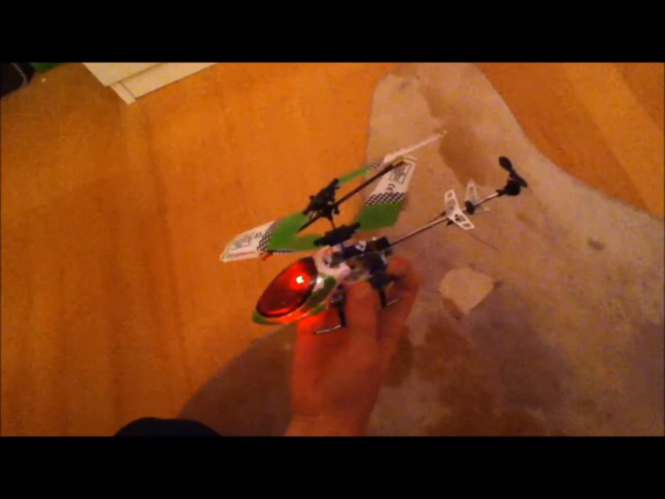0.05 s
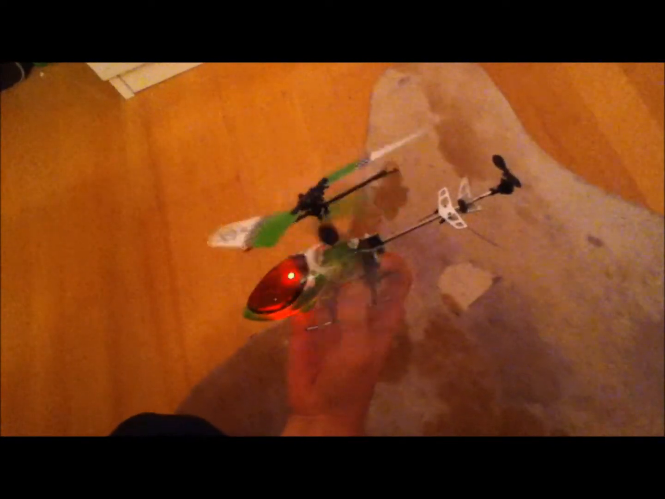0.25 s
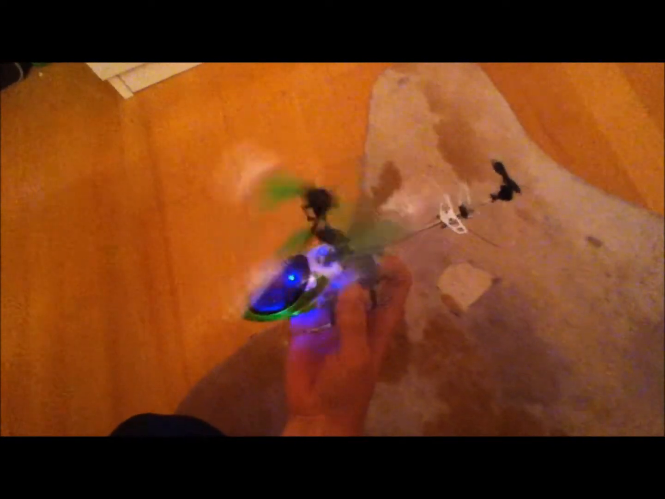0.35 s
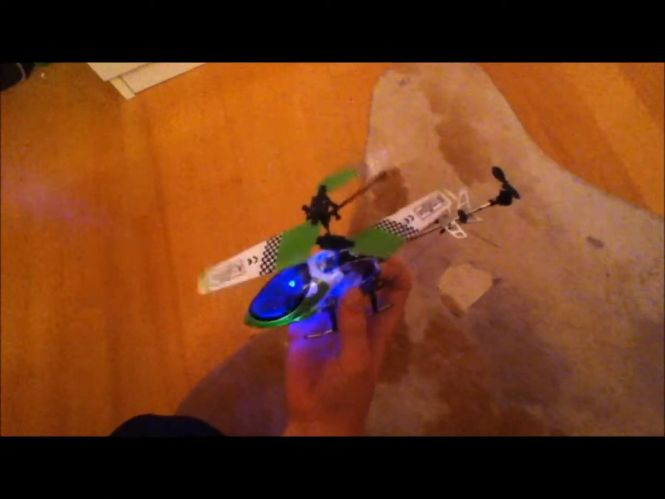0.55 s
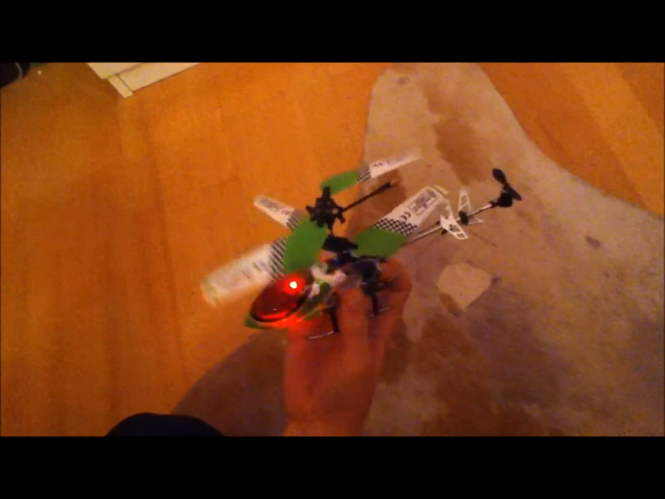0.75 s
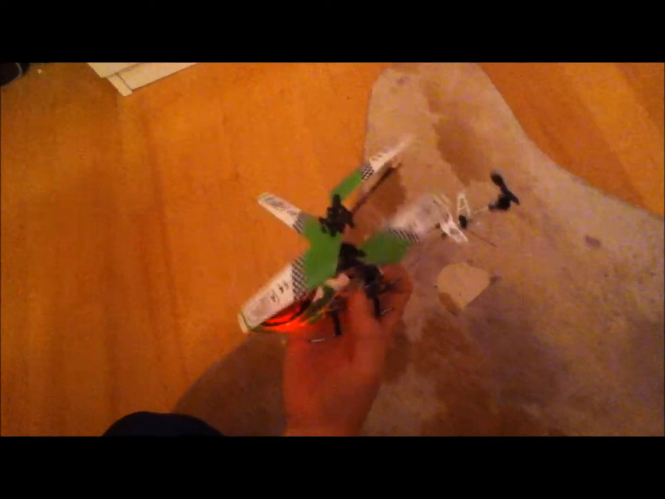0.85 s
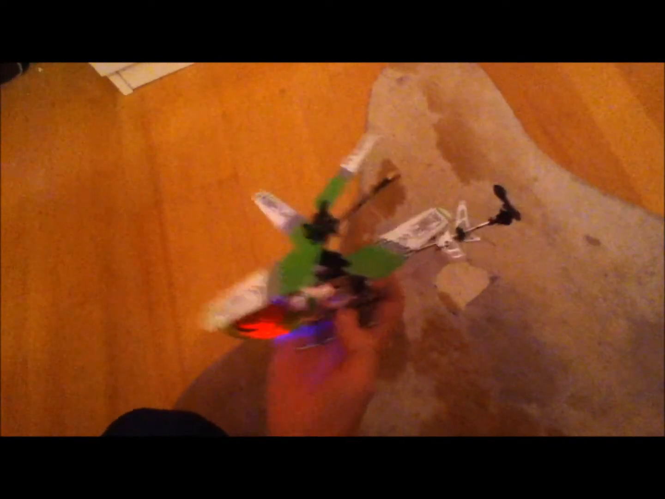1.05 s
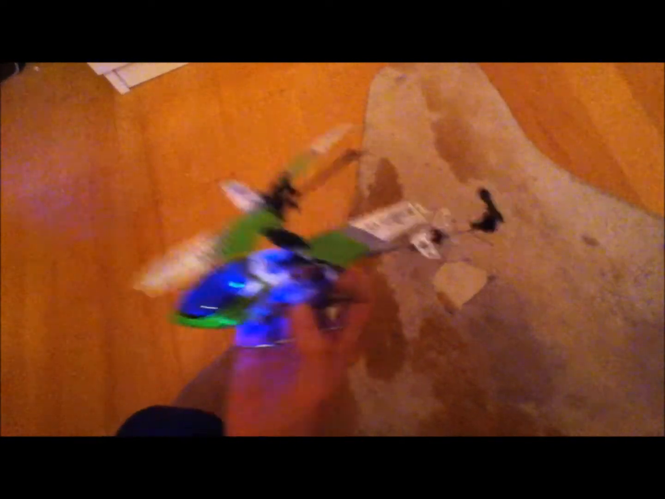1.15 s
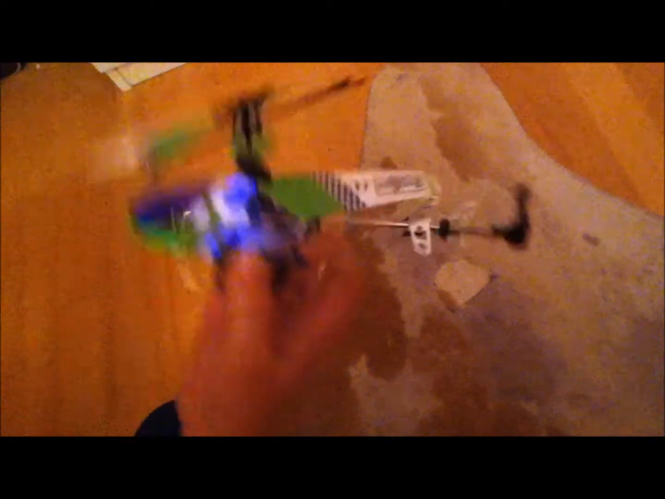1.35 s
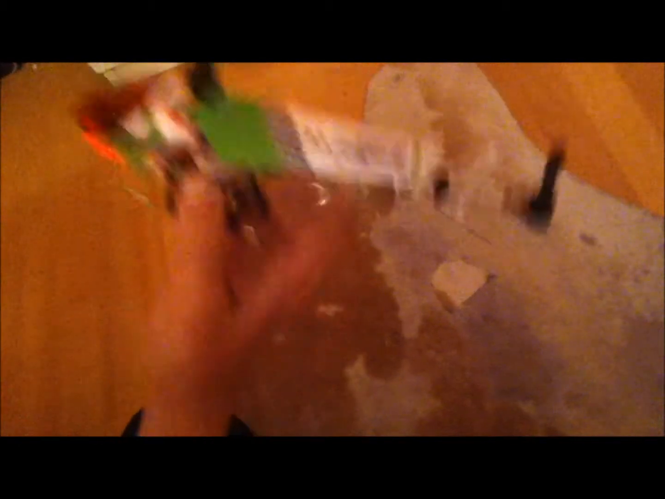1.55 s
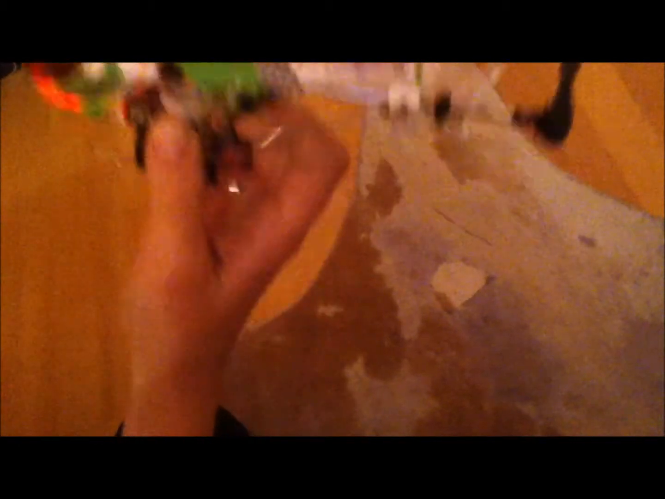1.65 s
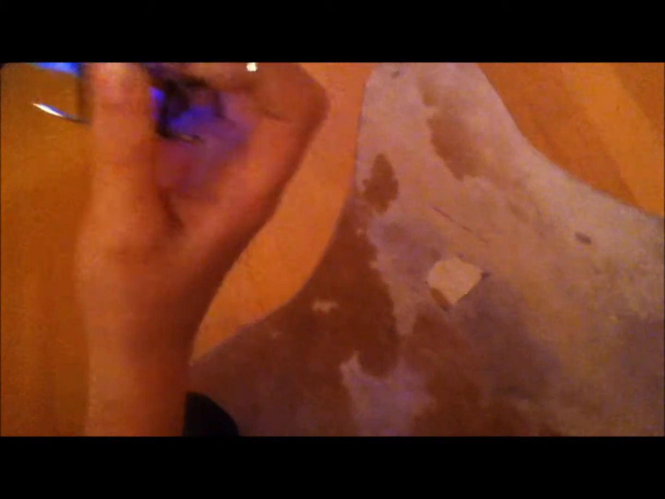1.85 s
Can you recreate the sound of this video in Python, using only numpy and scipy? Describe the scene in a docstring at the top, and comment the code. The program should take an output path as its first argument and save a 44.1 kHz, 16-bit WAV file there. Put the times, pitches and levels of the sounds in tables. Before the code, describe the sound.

Close up in a small room with a faint hum, a toy helicopter spins up with a squeaky rasp. A blade clacks once, the gears whine and rattle, then coast down, followed by light handling knocks.

```python
"""A small room with a faint hum, one microphone close to a hand-held toy helicopter.
Its two rotor motors start with a rasp and squeal of plastic gears. The meshing teeth whine, the two
motors beating against each other, while loose teeth rattle the hull and a blade clacks once.
The motors coast down with a hiss of brushes; then fingers rub and knock the hull."""
import sys
import numpy as np
from scipy import signal
from scipy.fft import rfft, irfft, next_fast_len
from scipy.io import wavfile
from scipy.ndimage import uniform_filter1d, minimum_filter1d, map_coordinates

SR = 44100
rng = np.random.default_rng(int(sys.argv[2]) if len(sys.argv) > 2 else 0)


def unload_wav(signal):
    """Save mono or channel-first audio to the path in sys.argv[1] as 16-bit WAV at rate SR, clipped to [-1, 1]."""
    wavfile.write(
        sys.argv[1],
        SR,
        np.round(np.clip(np.atleast_2d(signal).T, -1, 1) * 32767).astype(np.int16),
    )


N = 83790

# room tone at the microphone: t/s, level/dB
ROOM_TONE_LEVEL = [(0, -51), (.2, -51), (.4, -57.5), (1.2, -54), (1.7, -53.5), (1.9, -52.5)]
# spectrum of the room tone: f/Hz, relative level/dB
ROOM_TONE_COLOUR = [(15, -42), (25, -12.5), (127, -1), (363, -6.5), (416, -10.5), (451, -6), (591, -14.5),
                    (641, -8.5), (775, -16), (1070, -12), (1230, -19), (2690, -20.5), (3080, -22),
                    (14800, -28.5), (16000, -17.5)]
# reverberation of the room: f/Hz, t60/s
ROOM_DECAY = [(200, .35), (1800, 0.5), (5000, 0.14), (14000, 0.52)]

# a finger sliding on the hull: t/s, level/dB
RUB_LEVEL = [(1.36, -76.5), (1.397, -44.5), (1.425, -42), (1.465, -49.5), (1.49, -66)]
# spectrum of the rub: f/Hz, relative level/dB
RUB_COLOUR = [(470, -71.5), (800, -37), (1590, -6.5), (1780, -6.5), (2730, -15.5), (3360, -10.5),
              (4680, -22), (6600, -13), (8030, -21.5), (10500, -13.5), (15000, -42)]
# fingers knocking the hull: t/s, level/dB, t60/s, tilt/(dB per octave)
KNOCKS = [(1.4745, -36.5, 0.022, 0), (1.4805, -28, 0.027, 1.5), (1.4845, -25.5, 0.069, 0),
          (1.4895, -26.5, .035, -2.5), (1.506, -42.5, .1, 3), (1.8095, -34.5, 0.055, 2),
          (1.8165, -38, .025, 2), (1.8205, -37, 0.041, 3.5)]
# spectrum of a knock: f/Hz, relative level/dB
KNOCK_COLOUR = [(290, -63), (500, -33.5), (1000, -27), (1770, 0.5), (2100, -12), (2570, -21), (3180, -15.5),
                (4540, -26), (7360, -19.5), (9380, -27), (10500, -27), (13800, -41), (15000, -33.5)]
# a blade striking and bouncing: t/s, level/dB, t60/s, tilt/(dB per octave)
CLACKS = [(.4915, -5.5, 0.038, 1.5), (.499, -20.5, .03, -8), (.511, -22, .06, -7.5)]
# spectrum of the clack: f/Hz, relative level/dB
CLACK_COLOUR = [(200, -69.5), (700, -46), (1600, -16.5), (2800, -13), (3500, -9), (3950, 3.5), (4550, -0.5),
                (5500, -14), (7000, -10.5), (11500, -17.5), (15000, -29.5)]

# brush hiss, strongest as the motors coast: t/s, level/dB
BRUSH_LEVEL = [(.95, -67), (1.1, -46), (1.23, -51.5), (1.32, -53.5), (1.4, -61)]
# spectrum of the brushes: f/Hz, relative level/dB
BRUSH_COLOUR = [(1000, -32.5), (3000, -14.5), (4150, -0.5), (5200, -6.5), (8200, -2.5), (9200, 3),
                (10300, -5.5), (13000, -16.5), (16000, -16.5)]
# gears slipping at the start: t/s, f/Hz, level/dB
SQUEAL = [(.25, 2361, -35), (.276, 2198, -12.5), (.287, 2033, -9), (.297, 1971, -9), (.306, 1877, -19.5),
          (.313, 2079, -8), (.321, 1928, -39.5), (.333, 1972, -10.5), (.343, 2000, -16.5),
          (.37, 1927, -43.5)]
# teeth sliding on each other: t/s, level/dB
RASP_LEVEL = [(.228, -15.5), (.25, -16.5), (.28, -11), (.3, -18.5), (.34, -15), (.36, -28), (.41, -18.5),
              (.46, -20.5), (.55, -26), (.7, -27.5), (.82, -26.5), (.93, -36.5), (.98, -31.5), (1.015, -30),
              (1.04, -42), (1.065, -33), (1.1, -51.5), (1.18, -57.5), (1.3, -59.5), (1.4, -63)]
# low end of the rasp's spectrum: f/Hz, relative level/dB
RASP_LOWS = [(100, -59), (700, -30.5), (1100, -19), (1300, -13)]
# the rest of that spectrum: f/Hz, relative level/dB
RASP_HIGHS = [(1410, -22.5), (2400, -10.5), (2590, -8.5), (3200, -1.5), (3440, -13.5), (3920, -2.5),
              (5160, -6), (5660, -4.5), (6370, -11.5), (7050, -3.5), (8980, -9), (11200, -10.5),
              (12800, -12.5), (14400, -18.5), (15500, -23.5)]
# narrow rings of the metal motor parts: f/Hz, width/Hz, relative level/dB
METAL_MODES = [(7074, 190, 1.5), (11290, 110, 0.5)]
# loose teeth rattling the hull: t/s, level/dB
RATTLE_LEVEL = [(.228, -16.5), (.265, -23), (.288, -47), (.305, -35), (.335, -13.5), (.355, -32),
                (.47, -22), (.56, -29), (.64, -25.5), (.85, -26.5), (.92, -40), (1.0, -37.5), (1.1, -32.5),
                (1.18, -38.5), (1.265, -40.5), (1.29, -58), (1.4, -60)]
# resonances of the plastic hull: f/Hz, width/Hz, relative level/dB
HULL_MODES = [(1232, 160, -18.5), (1516, 200, -2.5), (1827, 275, 0.5), (1910, 156, 6.5), (2142, 520, -4)]
# rate at which the gear teeth meet: t/s, f/Hz
TOOTH_RATE = [(.228, 250), (.29, 495.9), (.36, 659.3), (.45, 772), (.54, 792), (.6, 812.3), (.69, 825.8),
              (.85, 810.5), (.885, 830.7), (.97, 809.4), (1.0, 717.5), (1.05, 579.2), (1.11, 475),
              (1.19, 354.2), (1.3, 220), (1.4, 89.3)]
# whine of the meshing teeth: t/s, level/dB
WHINE_LEVEL = [(.228, -53), (.35, -27.5), (.44, -27.5), (.55, -24.5), (.61, -22), (.68, -19.5),
               (.735, -18.5), (.785, -20), (.825, -17), (.88, -21), (.94, -14), (.98, -16.5),
               (1.025, -15.5), (1.045, -28.5), (1.11, -26), (1.135, -37.5), (1.19, -42.5), (1.27, -51),
               (1.3, -78), (1.4, -94)]
# how the hull radiates the whine: f/Hz, relative level/dB
WHINE_COLOUR = [(300, -15.5), (600, -32.5), (820, -19), (1020, -21), (1250, -19.5), (1600, -0.5),
                (2000, 2.5), (2480, -6.5), (3200, -14), (4100, -10), (4900, -11), (5700, -12.5),
                (6500, -15.5), (9000, -21), (10600, -23), (11400, -24.5), (12200, -24.5), (14000, -29)]
# two motors, the second weaker and duller: speed offset/share, relative level/dB, tilt/(dB per octave)
MOTORS = [(-.00946, 0, .015), (.0086, -2.5, -3.5)]

START_S, ATTACK_S, STOP_S, RELEASE_S = .2273, .0075, 1.38, .05
POWER_OFF_S, UNLOAD_S = .88, .067
BEAT_CREST_S, THROB_CREST_S, TEETH_PER_TURN = .647, .745, 57.94
THROB_DB, TREBLE_THROB_DB = 1, 2.5  # the whine swells once a rotor turn, more so in the treble
TREBLE_HZ, COAST_TREBLE_DB = 3270, -7  # unloaded teeth sound duller
BACKLASH_RAD, COAST_EXTRA_RAD = .2, 1.3  # and rougher: phase scatter of the treble


def amp(db):
    """Decibels to gain."""
    return 10 ** (np.asarray(db) / 20)


def unit(x):
    """Scale to rms 1."""
    return x / np.sqrt(np.mean(x ** 2) + 1e-20)


def clock():
    """Time of each sample in seconds."""
    return np.arange(N) / SR


def curve(rows):
    """Join (t/s, value) points by straight lines."""
    return np.interp(clock(), *np.transpose(rows))


def along(points, hz):
    """Read (f/Hz, value) points on a log frequency axis."""
    f, values = np.transpose(points)
    return np.interp(np.log(hz + 1), np.log(f + 1), values)


def wobble(rate):
    """A smooth random curve, rate knots a second."""
    t = clock()
    knots = rng.standard_normal(4096)
    return np.interp(t, t[::8], map_coordinates(knots, [t[::8] * rate], mode="wrap"))


def filtered(x, response):
    """Pass x through a frequency response."""
    size = next_fast_len(N + SR // 2)
    return irfft(rfft(x, size) * response(np.fft.rfftfreq(size, 1 / SR)), size)[:N]


def noise(colour, grain=1):
    """Coloured noise of rms 1, optionally broken into grains."""
    return unit(filtered(grain * rng.standard_normal(N), lambda hz: amp(along(colour, hz))))


def resonances(modes, f):
    """Summed response of damped modes of alternating sign."""
    return sum((-1) ** k * amp(db) * 1j * f * width / (centre ** 2 - f ** 2 + 1j * f * width)
               for k, (centre, width, db) in enumerate(modes))


def plastic_hits(rows, colour, rise_s):
    """Well damped blows on plastic: noise bursts, each with its own brightness and decay."""
    out = np.zeros(N)
    for onset, db, t60, tilt_db in rows:
        age = np.maximum(clock() - onset, 0)
        tilted = [(hz, level + tilt_db * np.log2(hz / 3000)) for hz, level in colour]
        attack = 1 - np.exp(-(age / rise_s) ** 2)
        decay_db = 60 * np.maximum(age - 2 * rise_s, 0) / t60
        out += noise(tilted) * attack * amp(db - decay_db)
    return out


def room_tone(hum_hz=457.6, hum_db=-62.5):
    """Behind the toy: dull room noise and a faint steady hum."""
    pitch = hum_hz + .8 * wobble(10)
    hum = np.sqrt(2) * np.sin(2 * np.pi * np.cumsum(pitch) / SR)
    return amp(curve(ROOM_TONE_LEVEL)) * noise(ROOM_TONE_COLOUR) + amp(hum_db) * hum


def room_reverb(direct, level_db=-11):
    """The walls' reflections reach the microphone 5 ms late; each band dies at its own rate."""
    hz, t, spectrum = signal.stft(rng.standard_normal(SR // 2), SR, nperseg=256)
    decay = amp(-60 * t / along(ROOM_DECAY, hz)[:, None])
    tail = signal.istft(spectrum * decay, SR, nperseg=256)[1]
    response = np.pad(tail / np.linalg.norm(tail), (SR // 200, 0))
    return amp(level_db) * signal.fftconvolve(direct, response)[:N]


def fingers():
    """Handling noise: fingers knock the hull and slide over it."""
    knocks = plastic_hits(KNOCKS, KNOCK_COLOUR, rise_s=.001)
    return knocks + noise(RUB_COLOUR) * amp(curve(RUB_LEVEL))


def blade_clack():
    """A blade strikes once, with two softer, duller bounces."""
    return plastic_hits(CLACKS, CLACK_COLOUR, rise_s=.003)


def brush_hiss():
    """The motors' sliding brushes give a thin hiss."""
    return noise(BRUSH_COLOUR) * amp(curve(BRUSH_LEVEL))


def gear_squeal(waver=.045):
    """Stick-slip as the gears take up the load: a rough falling tone."""
    times, hz, db = np.transpose(SQUEAL)
    pitch = np.interp(clock(), times, hz) * (1 + waver * wobble(600))
    level = np.interp(clock(), times, amp(db), left=0, right=0)
    return np.sqrt(2) * level * np.sin(2 * np.pi * np.cumsum(pitch) / SR)


def gear_rasp(tooth_hz, grain_db=1, metal_db=-5):
    """Bright grainy friction, pulsing once a tooth, with a thin sizzle from the metal parts."""
    pulses = 1 + .5 * np.cos(2 * np.pi * np.cumsum(tooth_hz) / SR)
    grain = unit(pulses * amp(grain_db * wobble(810)))
    sizzle = unit(filtered(rng.standard_normal(N), lambda f: resonances(METAL_MODES, f)))
    friction = noise(list(RASP_LOWS) + list(RASP_HIGHS), grain)
    return (friction + amp(metal_db) * sizzle) * amp(curve(RASP_LEVEL))


def hull(f):
    """Response of the plastic shell, which is too small to radiate bass."""
    radiation = (1j * f / (1j * f + 900)) ** 2
    bass_cut = 1 / np.sqrt(1 + (1150 / (f + 1)) ** 10)
    return resonances(HULL_MODES, f) * radiation * bass_cut


def gear_rattle(tooth_hz, jitter_teeth=.12, scatter_db=2.5):
    """Each tooth strikes a little early or late, with its own force, and rings the hull."""
    teeth = np.cumsum(tooth_hz) / SR
    count = int(teeth[-1])
    timing, force = rng.standard_normal((count, 2)).T
    strike_samples = np.interp(np.arange(count) + jitter_teeth * timing, teeth, np.arange(N))
    blows = np.bincount(strike_samples.astype(int), amp(scatter_db * np.clip(force, -2, 2)), N)
    ring = filtered(blows, hull)
    running_rms = np.sqrt(np.abs(uniform_filter1d(ring ** 2, size=900)) + 1e-12)
    return ring / running_rms * amp(curve(RATTLE_LEVEL))


def gear_whine(tooth_hz, flutter_share=.004, shimmer_db=3.43):
    """Tooth harmonics of two motors beat; play between the teeth blurs the treble, most when coasting."""
    out, t = np.zeros(N), clock()
    coasting = np.clip((t - POWER_OFF_S) / UNLOAD_S, 0, 1)
    backlash = BACKLASH_RAD + COAST_EXTRA_RAD * coasting
    flutter = flutter_share * wobble(120)
    rotor_turns = np.cumsum(tooth_hz) / SR / TEETH_PER_TURN
    throb = np.cos(2 * np.pi * (rotor_turns - np.interp(THROB_CREST_S, t, rotor_turns)))
    treble_db = COAST_TREBLE_DB * coasting + TREBLE_THROB_DB * throb
    for offset, motor_db, tilt_db in MOTORS:
        hz = tooth_hz * (1 + offset + flutter)
        teeth = np.cumsum(hz) / SR
        teeth -= np.interp(BEAT_CREST_S, t, teeth)  # the motors are in step here
        for k in range(1, 18):
            treble_share = 1 / (1 + (TREBLE_HZ / (k * hz)) ** 10)
            db = motor_db + tilt_db * np.log2(k) + along(WHINE_COLOUR, k * hz)
            db += treble_share * treble_db + shimmer_db * wobble(70.06)
            blur = backlash * treble_share * wobble(400)
            out += amp(db) * np.sin(2 * np.pi * k * teeth + k * k + blur)  # k * k spreads the phases
    return out * amp(curve(WHINE_LEVEL) + THROB_DB * throb)


def scene():
    """The toy up close and the room behind it, mono on both channels."""
    tooth_hz, t = curve(TOOTH_RATE), clock()
    running = np.clip((t - START_S) / ATTACK_S, 0, 1) * np.clip(1 - (t - STOP_S) / RELEASE_S, 0, 1)
    gears = gear_whine(tooth_hz) + gear_rattle(tooth_hz) + gear_rasp(tooth_hz) + gear_squeal()
    toy = running * (gears + brush_hiss()) + fingers() + blade_clack()
    return np.tile(toy + room_reverb(toy) + room_tone(), (2, 1))


def record(dry):
    """After the microphone, a fast limiter holds peaks at full scale and the top treble is cut."""
    limiter_s, top_hz = .002, 16000
    window = int(limiter_s * SR)
    needed_gain = 1 / np.maximum(np.abs(dry).max(axis=0), 1)
    gain = uniform_filter1d(minimum_filter1d(needed_gain, size=window), size=window)
    return np.array([filtered(channel * gain, lambda hz: hz < top_hz) for channel in dry])


dry = scene()
out = record(dry)
unload_wav(out)
```